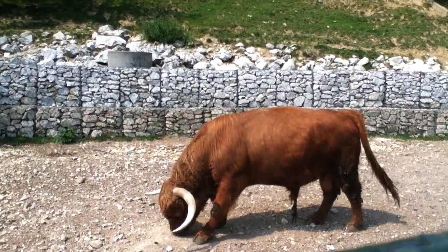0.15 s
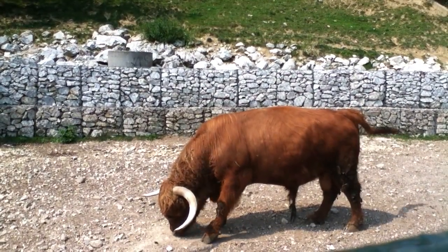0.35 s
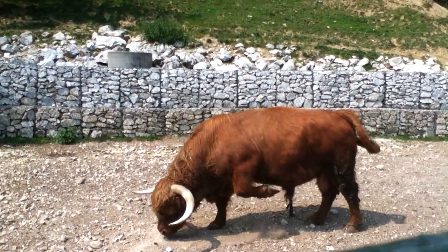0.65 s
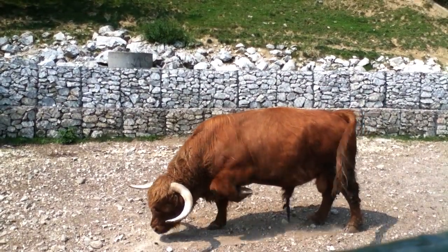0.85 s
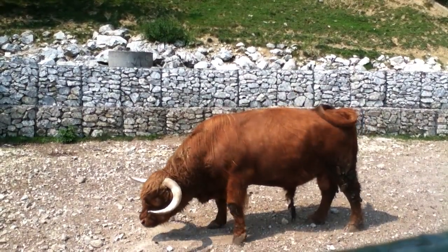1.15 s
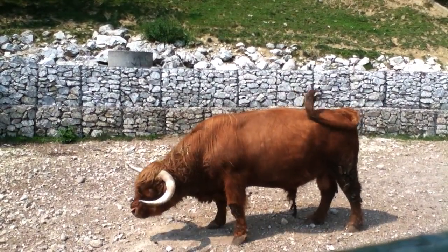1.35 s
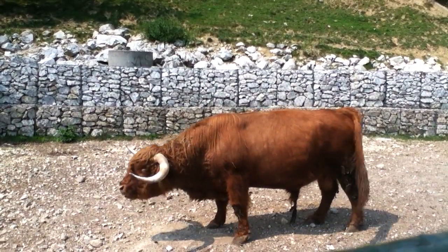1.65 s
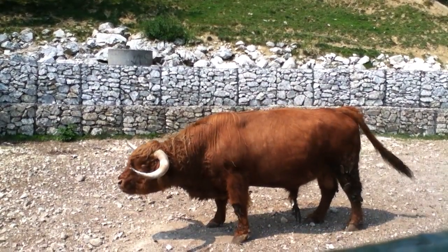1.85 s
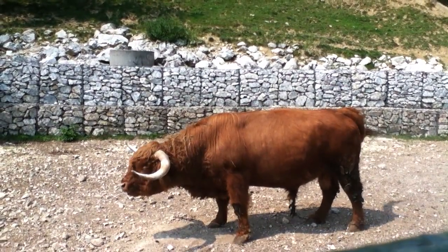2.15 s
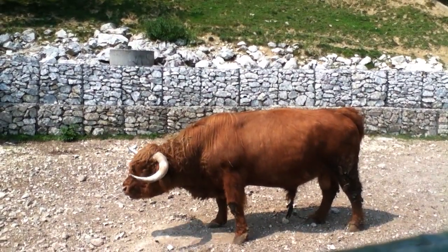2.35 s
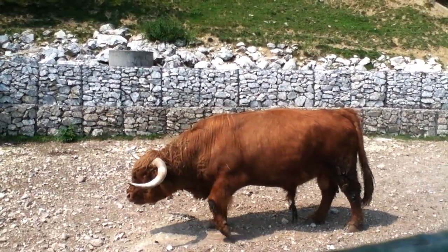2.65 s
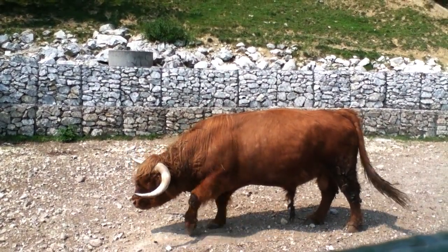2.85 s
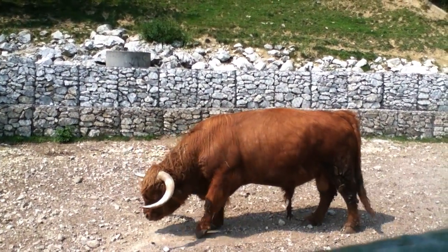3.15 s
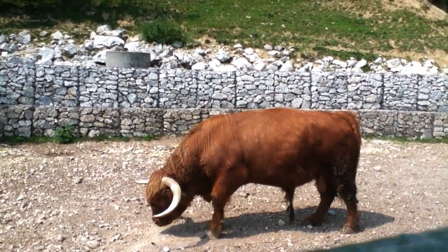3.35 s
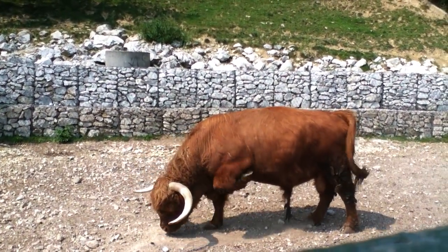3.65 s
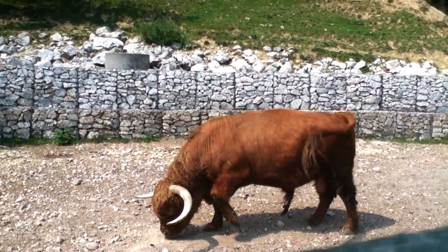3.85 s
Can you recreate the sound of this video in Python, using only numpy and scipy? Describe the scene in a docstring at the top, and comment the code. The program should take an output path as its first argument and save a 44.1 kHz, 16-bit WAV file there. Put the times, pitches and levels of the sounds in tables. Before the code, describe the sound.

Low nasal moo from a bull, sustained and roughening, with hoof knocks and grinding stones outdoors

```python
"""Dull thuds and a burst of clicking, grinding stones open the scene: a bull paws the gravel of a walled pen.
At 1.3 s it lows with its mouth nearly shut, one slowly rising note: three strong partials and a nasal buzz.
The note roughens as alternate pulses weaken; two faint bird calls are gliding sines; the hoof grinds again
as filtered ticks and ringing knocks, and late on the voice catches twice as short nasal rings.
Behind it all lie shaped-noise air and a far engine of harmonics, its noise-band whine fading by 2.5 s."""
import sys
import numpy as np
from scipy import signal
from scipy.fft import rfft, irfft
from scipy.io import wavfile

SR = 44100
rng = np.random.default_rng(int(sys.argv[2]) if len(sys.argv) > 2 else 0)


def int16_out(signal):
    """Quantize to a 16-bit WAV file."""
    q = np.round(np.clip(np.atleast_2d(signal).T, -1, 1) * 32767)
    wavfile.write(sys.argv[1], SR, q.astype(np.int16))


N = 176400
T = np.arange(N) / SR

# pitch of the low: t/s, f/Hz
PITCH = [(1.31,107.8),(1.37,109.3),(1.42,106.7),(1.55,113.5),(1.68,114.3),(1.76,117.5),(1.99,118.1),(2.08,123.3),(2.28,127.9),(2.5,129),(2.63,132.1),(2.72,131.2),(3.0,129.6),(3.27,130.1),(3.36,124.3),(3.47,129.4),(3.55,125.5),(3.68,128.7),(3.83,132.9),(3.89,136.8),(3.97,140.7),(4,139.3)]
# the three lowest partials: t/s, first level/dB, second level/dB, third level/dB
PARTIALS = [(1.29,-53,-61,-65),(1.32,-32,-54,-63),(1.37,-36,-32,-50),(1.44,-36.5,-23.5,-50),(1.56,-37,-26.5,-41.5),(1.7,-37,-23,-43.5),(1.78,-36,-22.5,-35.5),(2.03,-34.5,-21,-41),(2.17,-32.5,-27.5,-32),(2.45,-29.5,-22,-31.5),(2.72,-26.5,-28,-32),(3.04,-28,-20,-33),(3.17,-27,-21.5,-34),(3.35,-28.5,-18.5,-26.5),(3.43,-28,-21.5,-29),(3.52,-28.5,-20,-34.5),(3.63,-28,-21,-35.5),(3.8,-25.5,-20.5,-30),(3.89,-22.5,-19.5,-36),(4.0,-19,-20,-33)]
# clear upper partials that swell and fade as the mouth moves: multiple, start t/s, peak t/s, end t/s, level/dB
# (where the peak lies past the end, the partial climbs and then stops)
UPPER_PARTIALS = [(7,1.68,1.83,2.76,-45.5),(4,3.3,4.35,4,-44.5),(5,3.716,5.3,4.42,-41),(6,3.4,3.85,4.3,-49.5),(13,2.8,7.3,3.2,-52),(20,2.4,2.5,2.87,-56)]
# roughness, how unequal alternate pulses are: t/s, amount/0-1
ROUGHNESS = [(2.3,0.12),(2.55,0.22),(2.64,0.57),(2.85,0.1),(3.0,0.81),(3.12,0.56),(3.25,0.7),(3.5,0.96),(3.66,0.3),(3.82,0.5),(3.9,0.14)]
# partials between the whole multiples: multiple of the pitch, level/dB at full roughness
HALF_PARTIALS = [(1.5,-28),(2.5,-42),(3.5,-49)]
# nasal buzz: t/s, level/dB
BUZZ_LEVEL = [(1.45,-55),(1.57,-43.5),(1.75,-53.5),(2.25,-48),(2.45,-40),(2.62,-41.5),(2.74,-53),(2.83,-35.5),(3.0,-36.5),(3.12,-54),(3.25,-41),(3.55,-36),(3.66,-34.5),(3.85,-28.5),(3.93,-39.5),(4.0,-43)]
# resonances of the nose: f/Hz, width/Hz, level/dB
NOSE_MODES = [(1320,59,0),(1404,34,-4)]
# resonances of the throat: f/Hz, width/Hz, level/dB
THROAT_MODES = [(892,330,2),(1844,192,11),(1930,150,-15),(2578,120,8),(6460,2200,-17.5)]
# throat overtones: t/s, level/dB
OVERTONE_LEVEL = [(1.4,-49),(1.65,-46.5),(1.85,-47.5),(2.1,-46.5),(2.35,-57),(2.6,-55),(3.0,-52),(3.6,-56),(3.95,-42.5)]
# hard pulses where the voice catches: t/s, level/dB
CATCHES = [(3.641,-22),(3.751,-23)]
# stones knocked by the hoof: t/s, peak level/dB, centre f/Hz, spread/octaves
KNOCKS = [(.1415,-20.5,2200,1.5),(.1483,-17,2260,0.93),(.1627,-6.5,2480,1.5),(.1735,-17.5,2200,1.6),(.4005,-21.5,2500,1.4),(.406,-16.5,1860,1.54),(.4379,-25,2500,2.1),(.5317,-27,1500,2.3),(.536,-19.5,1800,1.7),(.562,-30,2500,2.4),(.7123,-27.5,5840,1.2),(1.176,-21,950,1.17),(1.1922,-26.5,800,0.35),(1.1923,-26,4300,0.28),(1.5075,-26,6430,0.5),(3.0412,-12.5,900,0.29),(3.043,-30,5000,0.8),(3.0975,-24,2980,1.6),(3.1263,-31,3999,1.6),(3.3453,-25,4300,0.4),(3.353,-21,3730,0.69),(3.369,-20,1700,1.17),(3.385,-30,1701,1.4),(3.5009,-32,8060,0.64),(3.5399,-33,8100,1),(3.711,-35,8000,1.01)]
# ringing modes of a stone: f/Hz, width/Hz, level/dB
STONE_MODES = [(550,270,-6),(640,230,-7.5),(960,340,-4),(1444,280,2),(1860,240,-15),(3160,184,-8),(3800,230,-6.5),(4330,100,-18),(6470,254,-4),(9460,160,-10.5)]
# hoof drags and landing grit: start t/s, peak t/s, end t/s, level/dB, centre f/Hz
SCRAPES = [(0.138,0.166,0.36,-40.5,2200),(.385,0.4,0.59,-43.5,2200),(0.456,0.544,.64,-41,635),(.47,0.504,0.55,-44,4000),(0.544,0.569,0.6,-38.5,4460),(0.71,0.75,0.94,-50.5,7100),(2.941,2.98,3.17,-46.5,8000),(3.018,3.084,3.2,-37.5,3680),(3.044,3.06,3.57,-37.5,794),(3.164,3.195,3.25,-37,2870),(3.303,3.356,3.41,-30.5,3950),(3.317,3.374,3.43,-26.5,999.4),(3.36,3.4,3.46,-37,2830),(3.48,3.62,3.83,-54.5,8000)]
# dull thuds: t/s, decay/s, centre f/Hz, level/dB before the envelope
THUDS = [(.005,0.054,204,-35.5),(.07,.04,88.6,-38),(2.345,0.037,88,-30.5),(2.46,.03,70,-35),(2.595,0.032,70,-33)]
# bird calls: t/s, length/s, start f/Hz, f/Hz that the glide nears, level/dB
CHIRPS = [(2.685,.065,5100,3800,-49.5),(3.0,.055,6200,4800,-51)]
# engine harmonics: multiple, level/dB
ENGINE_HARMONICS = [(1,-49.5),(2,-46.5),(3,-51),(4,-50.5),(5,-56.5),(7,-57.5)]
# far whine: t/s, level/dB
WHINE_LEVEL = [(0,-59),(.4,-47),(.75,-45.5),(1.1,-52),(2.0,-48.5),(2.5,-74)]
# tone of the open air: f/Hz, relative level/dB per Hz
AIR_SPECTRUM = [(15,-44),(30,-7),(55,-1.5),(115,6.5),(250,2.5),(380,-1.5),(500,2),(800,-3.5),(1300,-2.5),(1900,-7),(2600,-10.5),(3600,-15),(5000,-21.5),(6800,-21),(10000,-25.5),(15000,-27.5)]
# open air: t/s, level/dB
AIR_LEVEL = [(0,-38.5),(.8,-37.5),(1.3,-38.5),(2.0,-38.5),(2.8,-38),(4,-40)]

# voice
JITTER, ROUGH_JITTER = 0.00305, 0.00584  # pitch drift as a fraction: always, and added at full roughness
SHIMMER_DB, PULSE_SCATTER_DB, HALF_FLICKER_DB = 0.8, 5, 2.5
HALF_WANDER_RAD, TRACT_LAG_RAD = 0.45, 0.35
ALTERNATION, BREATH_SHARE = 0.5, 0.71
RASP_HZ, RASP_WIDTH_HZ, RASP_DB = 240, 275, -39
NOSE_HZ, NOSE_WIDTH_HZ = 1365, 87
# the nasal bell that picks out clear overtones, and their share of the buzz power
CLEAR_HZ, CLEAR_SPREAD_HZ, CLEAR_SHARE = 1363, 57, 0.53
CATCH_HZ, CATCH_DECAY_S = 1344, 0.0089
# hoof and pen
CRACK_S, CRACK_DB, SETTLE_S, SETTLE_DB = 0.0019, -6.5, 0.017, -22
CONTACT_S = 0.00039  # time that a knock takes to build up
GRAINS_PER_S, GRAIN_SCATTER_DB, GRIT_OCTAVES, GRIT_RING = 640, 0.5, 1.03, 1.16
CLUMP_DB, CLUMP_RATE_HZ = 3.5, 59  # the hoof sticks and slips
SCRAPE_CURVE = 1.05  # exponent on the rise and fall
PEN_DB, PEN_DECAY_S = -14, 0.044
# background and recorder
CHIRP_WAVER = 0.035  # fraction of the pitch
ENGINE_HZ, WHINE_HZ, WHINE_WIDTH_HZ = 66.3, 2039, 220
MIC_HZ, TOP_HZ = 12500, 15800


def amp(db):
    """Decibels to gain."""
    return 10 ** (np.asarray(db) / 20)


def unit(x):
    """Scale to rms 1."""
    return x / np.sqrt(np.mean(x ** 2) + 1e-20)


def curve(rows, axis=1):
    """One column of a table, joined by straight lines in time."""
    rows = np.array(rows)
    return np.interp(T, rows[:, 0], rows[:, axis])


def noise():
    """White noise."""
    return rng.standard_normal(N)


def walk(rate):
    """Smooth random drift with a spread of 1; a higher rate (Hz) moves faster."""
    f = np.arange(N // 2 + 1) * SR / N
    return unit(irfft(rfft(noise()) * np.exp(-(f / rate) ** 2), N))


def band(x, hz, width_hz):
    """A resonance with gain 1 at its centre."""
    return signal.lfilter(*signal.iirpeak(hz, hz / width_hz, fs=SR), x)


def double_band(x, hz, width_hz):
    """The same resonance twice, for steeper skirts."""
    return band(band(x, hz, width_hz), hz, width_hz)


def body(x, modes):
    """Several resonances side by side."""
    return sum(amp(db) * band(x, hz, width) for hz, width, db in modes)


def colour(x, hz, octaves):
    """Keep a broad bell of the spectrum around a centre."""
    f = np.arange(len(x) // 2 + 1) * SR / len(x) + 1
    bell = np.exp(-.5 * (np.log2(f / hz) / octaves) ** 2)
    return irfft(rfft(x) * bell, len(x))


def bull():
    """Vocal folds give round partials, half partials when rough, and pulses that ring nose and throat."""
    rough, pitch = curve(ROUGHNESS), curve(PITCH)
    drift = (JITTER + ROUGH_JITTER * rough) * walk(25)
    cycles = np.cumsum(pitch * (1 + drift)) / SR
    phase = 2 * np.pi * cycles
    tones = low_partials(phase, rough) + upper_partials(phase) + half_partials(phase, rough)
    rasp = rough * amp(RASP_DB) * unit(double_band(noise(), RASP_HZ, RASP_WIDTH_HZ))
    source = fold_pulses(cycles, rough)
    buzz = nasal_buzz(source, phase, pitch)
    overtones = throat_overtones(source)
    onset = np.clip((T - PARTIALS[0][0]) / 0.011, 0, 1)
    return onset * (np.sqrt(2) * tones + rasp + buzz + overtones) + catches()


def partial(phase, k):
    """A multiple of the voice's cycle; the vocal tract delays the higher ones more."""
    return np.cos(k * phase - TRACT_LAG_RAD * k * k)


def low_partials(phase, rough):
    """The three strong partials, whose shimmer shrinks as the voice roughens."""
    out = 0
    for k in range(1, 4):
        shimmer = SHIMMER_DB * (rough - 1) * walk(14)
        out = out + amp(curve(PARTIALS, axis=k) + shimmer) * partial(phase, k)
    return out


def upper_partials(phase):
    """Single clear multiples of the pitch that swell and fade."""
    out = 0
    for k, start, peak, end, db in UPPER_PARTIALS:
        swell = np.sqrt(np.interp(T, [start, peak, end], [0, 1, 0]))
        out = out + amp(db + 2 * walk(13)) * swell * partial(phase, k)
    return out


def half_partials(phase, rough):
    """Unequal alternate pulses repeat every two cycles, which adds tones between the partials."""
    slip = HALF_WANDER_RAD * walk(44)
    out = 0
    for k, db in HALF_PARTIALS:
        tone = np.sin(k * phase - TRACT_LAG_RAD * k * k + slip)
        out = out + amp(db + HALF_FLICKER_DB * walk(16.8)) * tone
    return rough * out


def fold_pulses(cycles, rough):
    """One pulse a cycle, every other one weaker when rough, with breath that dies away after each."""
    alternate = 1 + ALTERNATION * np.sqrt(rough) * np.cos(np.pi * cycles)
    strength = amp(PULSE_SCATTER_DB * walk(45)) * alternate
    pulses = unit(np.diff(np.floor(cycles), prepend=0) * strength)
    breath = unit(np.exp(-(cycles % 1) / 0.38) * noise())
    return pulses + BREATH_SHARE * breath


def nasal_buzz(source, phase, pitch):
    """The nose favours a few clear overtones and rings under the grainy pulses."""
    clear = 0
    for k in range(9, 14):
        nearness = np.exp(-((k * pitch - CLEAR_HZ) / CLEAR_SPREAD_HZ) ** 2 / 2)
        clear = clear + nearness * amp(2 * walk(44)) * partial(phase, k)
    grainy = unit(band(body(source, NOSE_MODES), NOSE_HZ, NOSE_WIDTH_HZ))
    mix = np.sqrt(CLEAR_SHARE) * unit(clear) + np.sqrt(1 - CLEAR_SHARE) * grainy
    return mix * amp(curve(BUZZ_LEVEL))


def throat_overtones(source):
    """The fold pulses ring the throat's resonances."""
    ring = sum(amp(db) * double_band(source, hz, width) for hz, width, db in THROAT_MODES)
    return unit(ring) * amp(curve(OVERTONE_LEVEL))


def catches():
    """A hard pulse leaves a short nasal ring."""
    out = 0
    for start, db in CATCHES:
        age = np.maximum(T - start, 0)
        envelope = (1 - np.exp(-age / 0.00083)) * np.exp(-age / CATCH_DECAY_S)
        out = out + amp(db) * envelope * np.sin(2 * np.pi * CATCH_HZ * age)
    return out


def stones():
    """Each knock is a crack, a short ring and a trickle of settling sand."""
    size, lead = 2 ** 13, 2 ** 7  # samples; the lead leaves room for the filter's pre-ring
    out = np.zeros(N + size)
    t = np.maximum(np.arange(size) - lead, 0) / SR
    for start, db, hz, octaves in KNOCKS:
        ring = 0
        for mode_hz, width_hz, mode_db in STONE_MODES:
            detune = 1 + 0.004 * rng.standard_normal()
            tone = np.sin(2 * np.pi * (mode_hz * detune * t + rng.random()))
            ring = ring + amp(mode_db) * np.exp(-np.pi * width_hz * t) * tone
        decay = amp(CRACK_DB) * np.exp(-t / CRACK_S) + amp(SETTLE_DB) * np.exp(-t / SETTLE_S)
        crack = rng.standard_normal(size) * decay
        build_up = 1 - np.exp(-t / CONTACT_S)
        knock = colour((ring + crack) * build_up, hz, octaves)
        i = int(start * SR) - lead
        out[i:i + size] += amp(db) * knock / np.abs(knock).max()
    return out[:N]


def gravel():
    """A dragged hoof sets off clumps of tiny stone-on-stone ticks."""
    out = 0
    clumps = amp(CLUMP_DB * np.clip(walk(CLUMP_RATE_HZ), -2, 2))
    for start, peak, end, db, hz in SCRAPES:
        scatter = amp(GRAIN_SCATTER_DB * np.minimum(rng.exponential(size=N), 3))
        struck = rng.random(N) < GRAINS_PER_S / SR
        ticks = struck * clumps * scatter * np.sign(noise())
        ringing = unit(body(ticks, STONE_MODES))
        grit = colour(unit(ticks) + GRIT_RING * ringing, hz, GRIT_OCTAVES)
        swell = np.interp(T, [start, peak, end], [0, 1, 0]) ** SCRAPE_CURVE
        out = out + amp(db) * unit(grit) * swell
    return out


def pen_wall(hoof):
    """The stone wall scatters a little of the hoof sounds back as a short noisy tail."""
    echo = noise() * np.exp(-T / PEN_DECAY_S) * (T > .008)
    return amp(PEN_DB) * signal.fftconvolve(hoof, echo / np.linalg.norm(echo))[:N]


def thuds():
    """Soft low bumps of noise that die quickly."""
    out = 0
    for start, decay, hz, db in THUDS:
        age = np.maximum(T - start, 0)
        envelope = (1 - np.exp(-age / 0.0027)) * np.exp(-age / decay)
        out = out + amp(db) * unit(colour(noise(), hz, 0.54)) * envelope
    return out


def bird():
    """Thin wavering whistles that drop fast and level out."""
    out = 0
    for start, length, high_hz, low_hz, db in CHIRPS:
        u = np.clip((T - start) / length, 0, 1)
        hz = low_hz + (high_hz - low_hz) * np.exp(-3 * u)
        phase = 2 * np.pi * np.cumsum(hz * (1 + CHIRP_WAVER * walk(540))) / SR
        out = out + amp(db) * np.sqrt(np.abs(np.sin(np.pi * u))) * np.sin(phase)
    return out


def engine():
    """A far engine hums on unsteady harmonics, with a narrow band of noise as its whine."""
    phase = 2 * np.pi * np.cumsum(ENGINE_HZ * (1 + 0.00762 * walk(3.2))) / SR
    hum = 0
    for k, db in ENGINE_HARMONICS:
        hum = hum + amp(db + 3.6 * walk(6)) * np.sin(k * phase + 2 * np.pi * rng.random())
    whine = amp(curve(WHINE_LEVEL)) * unit(double_band(noise(), WHINE_HZ, WHINE_WIDTH_HZ))
    return np.sqrt(2) * hum + whine


def open_air():
    """Noise shaped to the open air's spectrum, with a slight flutter in level."""
    hz, db = np.array(AIR_SPECTRUM).T
    f = np.arange(N // 2 + 1) * SR / N + 1
    shape = amp(np.interp(np.log(f), np.log(hz), db))
    hiss = unit(irfft(rfft(noise()) * shape, N))
    return hiss * amp(curve(AIR_LEVEL) + .5 * walk(10))


def scene():
    """The bull's voice and hoof in the walled pen, over the distance."""
    hoof = stones() + gravel()
    background = thuds() + bird() + engine() + open_air()
    return (bull() + hoof + pen_wall(hoof) + background)[None]


def record(dry):
    """The microphone softens the highest treble and the recorder cuts the top."""
    soft = signal.sosfilt(signal.butter(2, MIC_HZ, fs=SR, output="sos"), dry)
    return signal.sosfilt(signal.ellip(10, .2, 80, TOP_HZ, fs=SR, output="sos"), soft)


dry = scene()
out = record(dry)
int16_out(out)
```